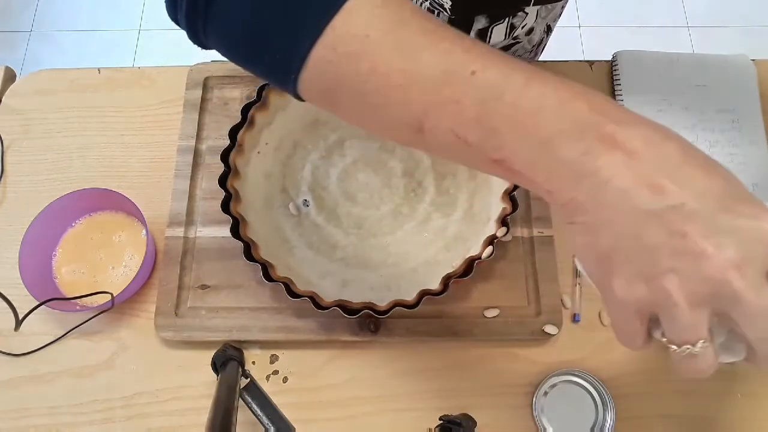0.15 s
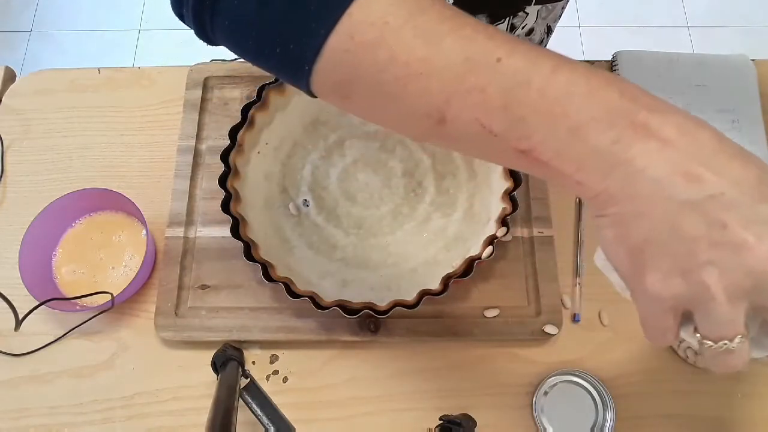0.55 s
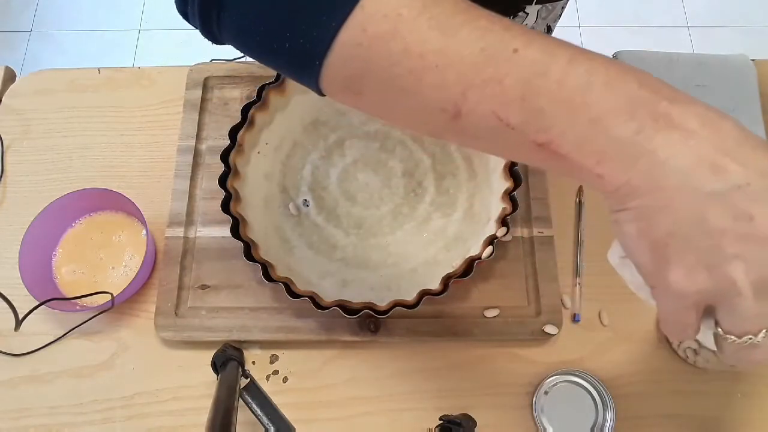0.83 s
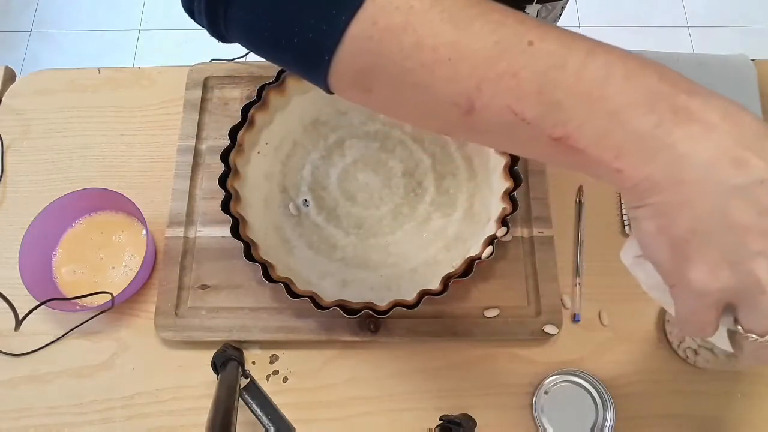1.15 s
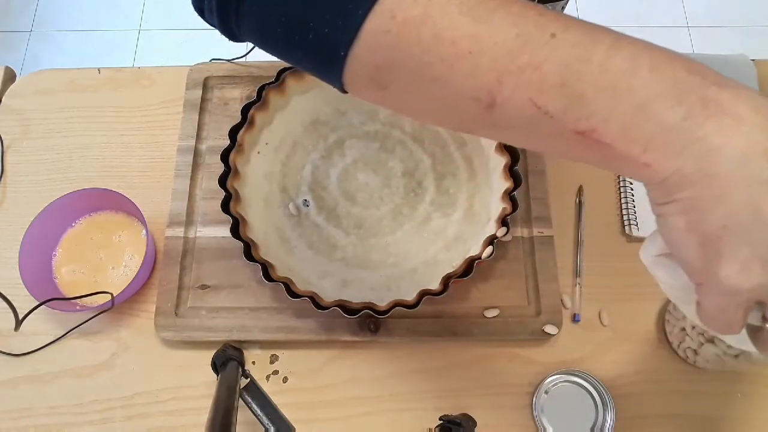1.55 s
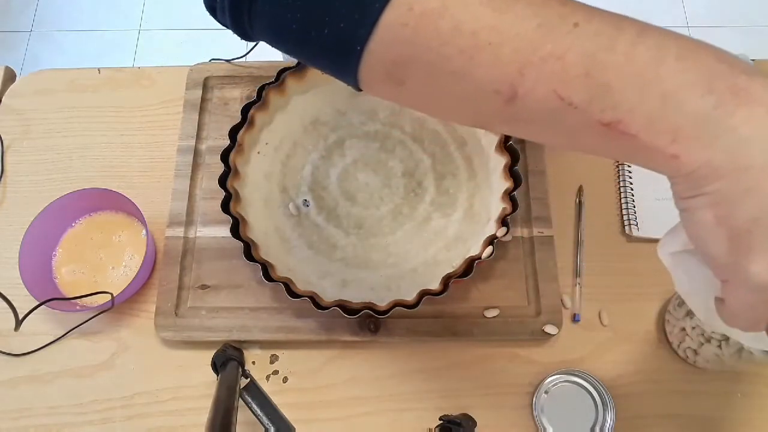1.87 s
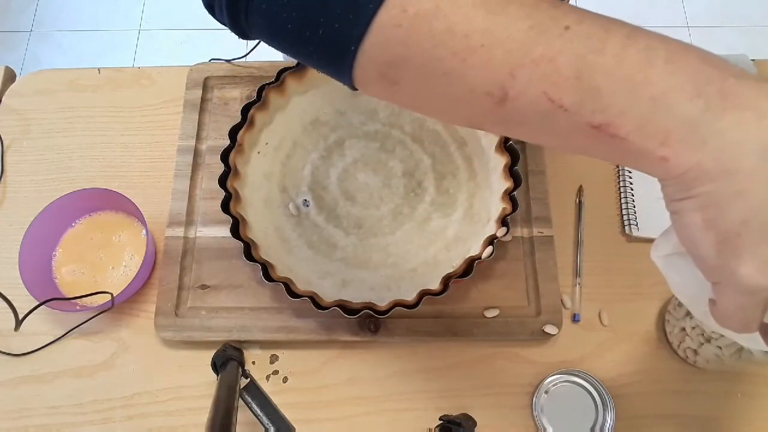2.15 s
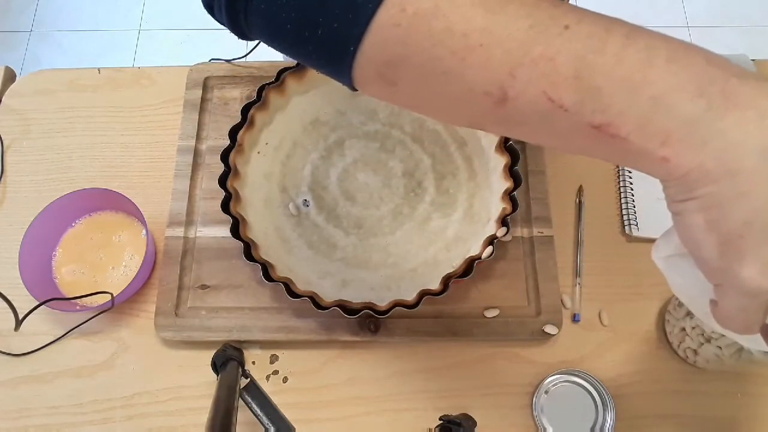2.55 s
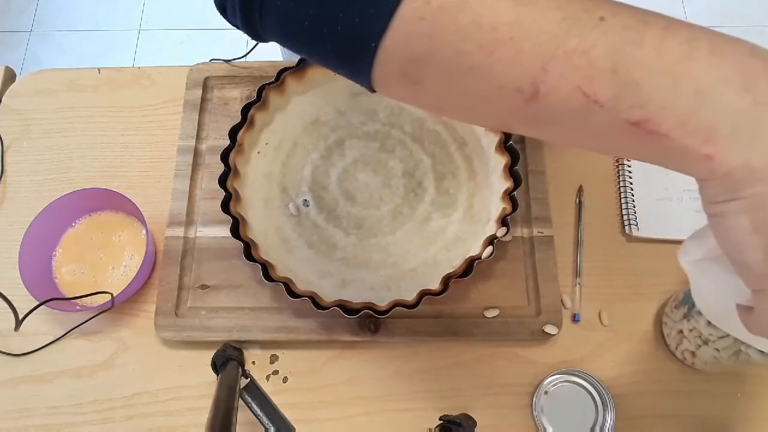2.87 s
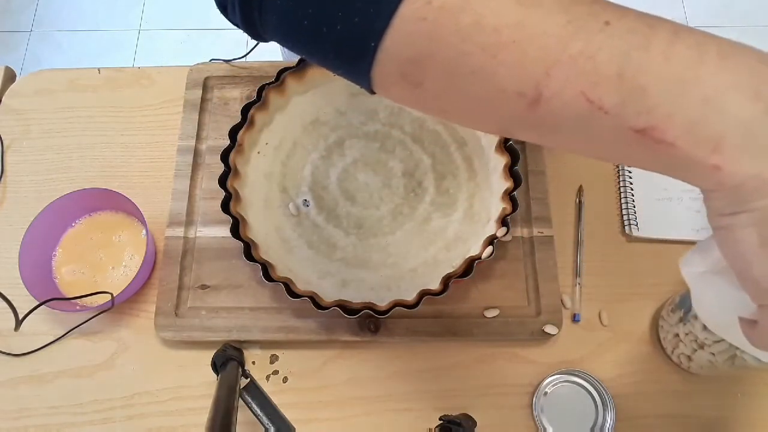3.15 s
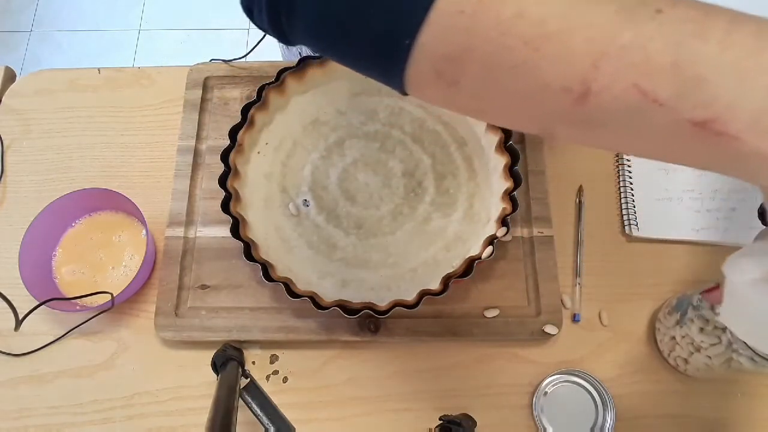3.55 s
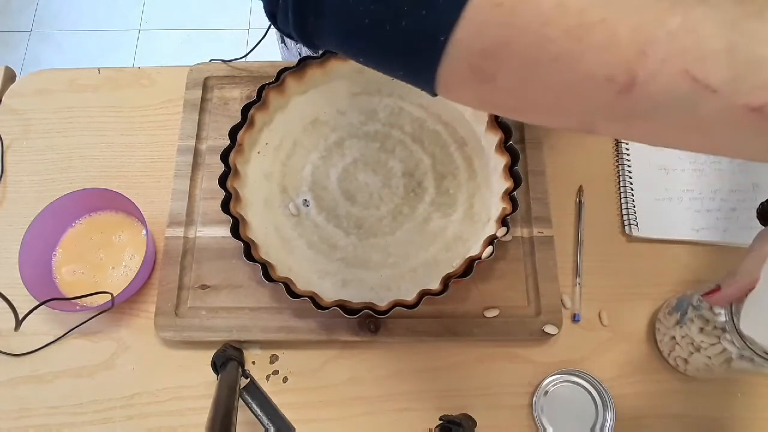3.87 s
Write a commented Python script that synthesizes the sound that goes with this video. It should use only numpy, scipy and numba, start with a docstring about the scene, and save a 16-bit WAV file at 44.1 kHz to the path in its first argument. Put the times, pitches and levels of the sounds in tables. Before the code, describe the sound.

Close up in a lively kitchen, a dense rattle of dried beans fills a glass jar, with bright clinks at first and a growing hollow drumming as the heap rises. Halfway through, the beans stop and a stiff sheet of baking paper gives a few sharp cracks and flaps, mixed with dull knocks. Finally the sheet is gathered up, crinkling and sliding over itself.

```python
"""Dried beans slide off a sheet of baking paper into a glass jar on a wooden table, in a live kitchen.
They come in surges, clacking on each other, drumming on the heap and ringing the glass, which goes dull
as it fills. After two seconds the pour runs out, and the emptied paper snaps and flaps a few times
among soft knocks. Last, the sheet is crumpled away, crackling and sliding over itself."""
import sys
import numpy as np
from scipy import signal
from scipy.fft import rfft, irfft
from scipy.io import wavfile
from scipy.ndimage import uniform_filter1d
from numba import njit

SR = 44100
rng = np.random.default_rng(int(sys.argv[2]) if len(sys.argv) > 2 else 0)


def wrap_up_sound(samples):
    """Save the sound to the file named by the first command line argument, as 16-bit audio."""
    columns = np.atleast_2d(samples).T
    # keep every value between -1 and 1, then stretch to whole-number steps
    tamed = np.clip(columns, -1, 1)
    steps = np.round(tamed * 32767).astype(np.int16)
    wavfile.write(sys.argv[1], SR, steps)


N = 176796
TIME = np.arange(N) / SR

# How far the heap presses on the jar wall. Each row: time in seconds, share from 0 to 1.
JAR_FILL = [(0, 0), (.6, 0.12), (1.0, 0.26), (1.3, 0.48), (1.55, 0.67), (2.0, 0.81)]
# Dull knocks of beans, paper and jar. Each row: start in seconds, peak in dB, pitch in Hz,
# send to the table in dB.
DULL_KNOCKS = [(.672, -18, 1110, 2.5), (.739, -17.5, 900, -9), (.905, -17, 440, -5), (1.409, -15, 527, -1),
               (1.61, -15.5, 1210, -13), (1.670, -11, 454, -20), (1.966, -8.5, 590, -20),
               (2.022, -15, 850, -5), (2.128, -17, 1770, -18), (2.278, -17, 830, -8), (2.429, -32, 860, -3),
               (2.441, -19, 600, -11), (2.920, -13.5, 560, -9), (2.955, -19, 328, 7),
               (3.026, -24.5, 900, 13), (3.138, -25, 690, -4), (3.216, -21.5, 840, 8.5),
               (3.467, -30.5, 770, -12), (3.593, -23.5, 726, -2), (3.647, -23, 1150, -5),
               (3.85, -19, 335, 17)]
# The papery body of a knock or flap. Each row: frequency in Hz, level in dB.
SHEET_TONE = [(30, -21), (80, -11), (130, -11), (210, -7), (330, 2.5), (520, -2.5), (850, 4.5),
              (1250, -1.5), (1900, -6.5), (3500, -19.5), (16000, -51)]
# Stiff creases flipping over. Each row: start in seconds, relative level in dB, treble gain in dB.
CREASE_SNAPS = [(2.025, -23.5, -20), (2.0868, -14.5, 9), (2.127, -22, -11), (2.2262, -31, 9),
                (2.28, -33, 10), (2.357, -18.5, -0.5), (2.532, -22.5, -1), (2.537, -12, 4),
                (2.6923, -27, -5), (2.8013, -30.5, -1), (2.807, -39.5, 9), (2.825, -20, 3.5),
                (3.022, -23, -11), (3.199, -39, 3), (3.443, -50, 17), (3.568, -35.5, -5), (3.593, -29, 9),
                (3.747, -34.5, 10), (3.779, -32, 2), (3.792, -31, 5), (3.876, -31.5, 15), (3.931, -34, 0),
                (3.953, -25.5, 1.5), (3.9724, -43, -15)]
# How hard the hand gathers up the sheet. Each row: time in seconds, effort in dB.
HAND_EFFORT = [(3.25, -10.5), (3.5, -12.5), (3.58, -4.5), (3.72, -2), (3.86, 5.5), (3.91, -5), (3.96, 5.5),
               (4.01, -12)]


def from_db(db):
    """Decibels to gain."""
    return 10 ** (np.asarray(db) / 20)


def steady(x, span_s=0.078):
    """Ride the slow level to about rms 1 and keep the grain."""
    power = np.abs(uniform_filter1d(x ** 2, int(span_s * SR)))
    return x / np.sqrt(power + 1e-3 * np.mean(x ** 2))


def in_time(curve):
    """Read an automation curve at every sample."""
    return np.interp(TIME, *np.transpose(curve))


def at_hz(curve, hz):
    """Read a curve on a log-frequency axis."""
    freqs, values = np.transpose(curve)
    return np.interp(np.log(np.maximum(hz, 1)), np.log(freqs), values)


def colour(x, spectrum, size=8192):
    """Minimum-phase EQ of unit energy with the given spectrum."""
    gains = from_db(at_hz(spectrum, np.fft.rfftfreq(size, 1 / SR)))
    cepstrum = irfft(np.log(gains))
    response = irfft(np.exp(rfft(2 * cepstrum[:size // 2], size)))
    return signal.fftconvolve(x, response / np.linalg.norm(response))[:len(x)]


def resonate(x, hz, width_hz):
    """A resonance with gain 1 at its peak."""
    r = np.exp(-np.pi * width_hz / SR)
    feedback = [1, -2 * r * np.cos(2 * np.pi * hz / SR), r * r]
    return signal.lfilter(np.array([1, 0, -1]) * (1 - r * r) / 2, feedback, x + 1e-18)


@njit
def ring(force, hz, width_hz):
    """A mode whose pitch and damping move; keeps the power of a white force."""
    out, state = np.zeros(len(force)), 0j
    for i in range(len(force)):
        r = np.exp(-np.pi * width_hz[i] / SR)
        state = state * r * np.exp(2j * np.pi * hz[i] / SR) + force[i] * np.sqrt(2 * (1 - r * r))
        out[i] = state.imag
    return out


def impacts(per_s, spread_db):
    """Random contacts, many light and a few heavy."""
    sizes = from_db(spread_db * np.minimum(rng.exponential(1, N), 4)) * rng.choice([-1, 1], N)
    return sizes * (rng.random(N) < per_s / SR)


def add(track, s, sound):
    """Mix a short sound in at s seconds."""
    part = track[int(s * SR):][:len(sound)]
    part += sound[:len(part)]


def burst(decay_s, size=2048):
    """A fast-dying puff of noise."""
    return rng.standard_normal(size) * np.exp(-TIME[:size] / decay_s)


def swell(start_s, end_s, attack_s, release_s):
    """An envelope that rises from start_s and dies away from end_s."""
    attack = 1 - np.exp(-np.maximum(TIME - start_s, 0) / attack_s)
    return attack * np.exp(-np.maximum(TIME - end_s, 0) / release_s)


def glass(hits, flow, fill, shielded_s=1.61, shield_db_per_s=23, clink_octaves=0.16):
    """Beans ring the jar; the growing heap damps and stiffens the wall, then shields it from hits."""
    # Glass modes. Each row: pitch in Hz, width in Hz, level in dB, then what a full jar adds to
    # the width in Hz, to the level in dB and to the pitch in Hz.
    modes = [(1900, 130, -19, 75, 1, 35), (2563, 10.3, -11, 72, -1.5, 40),
             (4315, 34, -4.5, 420, -10.5, 262), (5590, 100, -7.5, 307, -25, 99),
             (5770, 29, -2, 405, -14.5, 278), (8080, 69, -21.5, 40.5, 19, 9), (8050, 120, -6, 71, -26, 12),
             (9240, 8.5, -8.5, 128, -7, 118), (9435, 99, -14.5, 110, -4, 68), (9890, 77, -13, 200, -6, 44),
             (10500, 240, -23, 200, -15, 0), (11340, 69, -14.5, 300, -9, 32),
             (11970, 160, -19.5, 200, 1, 0), (13300, 200, -23, 150, 0, 0), (14000, 250, -24, 200, -10, 0),
             (14600, 900, -21.5, 0, -12, 0)]
    # Single hard hits. Each row: start in seconds, relative level in dB, frequency that rings most in Hz.
    clinks = [(0.251, -16, 4350), (.287, -30, 4380), (.617, -8.5, 2570), (.661, -15.5, 7900),
              (0.801, -19.5, 5700), (.828, -16.5, 9450), (.921, -22, 4300), (1.456, -17, 7800),
              (1.528, -21, 8000), (1.556, -19, 7900), (1.580, -16.5, 7700), (1.699, -16.5, 8140)]
    force = flow * from_db(-24.5 - shield_db_per_s * np.maximum(TIME - shielded_s, 0))
    out = 0
    for hz, width_hz, db, damping_hz, full_db, rise_hz in modes:
        pitch, width = hz + rise_hz * fill, width_hz + damping_hz * fill
        stream = steady(ring(hits * rng.standard_normal(N), pitch, width), span_s=0.24)
        hard_hits = np.zeros(N)
        for s, hit_db, best_hz in clinks:   # where a bean lands decides which modes it wakes
            detuning = np.log2(hz / best_hz) / clink_octaves
            add(hard_hits, s, 20 * from_db([hit_db]) / (1 + detuning ** 2))
        out += from_db(db + full_db * fill) * (stream * force + ring(hard_hits, pitch, width))
    return out


def beans(clack_db=-40.5, clack_growth_db=11.5, trickle_db_per_s=60):
    """Beans fall in surges, striking the glass and clacking on each other more as the heap grows."""
    # Surges off the paper. Each row: start in seconds, end in seconds, strength in dB.
    surges = [(-0.08, 0.458, 0.36), (0.508, 0.946, 0.84), (0.983, 1.367, 2.5), (1.402, 2.083, -1.5)]
    # Bean against bean. Each row: frequency in Hz, level in dB.
    clack_tone = [(300, -43.5), (900, 7.5), (1500, 2.5), (2200, 0), (3000, -4.5), (3900, 1.5), (5200, 0.5),
                  (7000, 1.5), (9500, -4), (12500, -18), (16000, -7)]
    flow = sum(from_db(db) * swell(start, end, 0.047, 0.045) for start, end, db in surges)
    fill = in_time(JAR_FILL)
    hits = steady(impacts(per_s=1100, spread_db=2.0))
    clack_gain = flow ** 0.13 * from_db(clack_db + clack_growth_db * np.sqrt(fill))
    clacks = clack_gain * steady(colour(hits, clack_tone))
    running_out = from_db(-trickle_db_per_s * np.maximum(TIME - surges[-1][1], 0))
    return (glass(hits, flow, fill) + clacks) * running_out


def table(thuds, width_hz=45):
    """The well-damped wooden resonances that a thud wakes."""
    # Tabletop modes. Each row: pitch in Hz, level in dB.
    modes = [(140, 3), (200, -7), (340, -2.5), (590, -1.5)]
    return sum(from_db(db) * resonate(thuds, hz, width_hz) for hz, db in modes)


def drumming(air_db=1.9, air_width_hz=90.0, heap_growth_db=14.5):
    """Beans thud on the heap, shake the table and stir the air in the jar."""
    # A thud on the heap. Each row: frequency in Hz, level in dB.
    thud_tone = [(30, -46), (90, -29), (160, -20), (280, -8.5), (380, -6.5), (480, -1.5), (700, -6),
                 (1200, -7), (1600, -18.5), (3000, -20.5), (16000, -67)]
    # The jar's air note, rising as beans take up room. Each row: time in seconds, pitch in Hz.
    air_note = [(0, 403), (.35, 443), (.8, 460), (2.0, 470)]
    thuds = colour(impacts(per_s=450, spread_db=1.5), thud_tone)
    airflow = ring(thuds, in_time(air_note), np.full(N, air_width_hz))
    air = steady(np.gradient(airflow))   # only the change of flow is heard, so no deep bass
    heap = from_db(heap_growth_db * in_time(JAR_FILL)) * steady(thuds + table(thuds))
    return steady(heap + from_db(air_db) * air)


def knocks(width_hz=300, rattle_s=0.01, rattle_db=-22):
    """Soft contacts: a push that rings for a few cycles, a brief paper rattle, and the table below."""
    out = np.zeros(N)
    for s, db, hz, send_db in DULL_KNOCKS:
        force = from_db(rattle_db) * burst(rattle_s, size=4096)
        force[0] += 1   # the push
        thud = colour(force, SHEET_TONE)
        knock = resonate(thud, hz, width_hz) + from_db(send_db + 0.5) * table(thud)
        add(out, s, from_db(db) * knock / np.abs(knock).max())
    return out


def trembling(knock_db=-5, attack_s=0.0043, settle_s=0.041):
    """Envelope of the loose sheet's shiver after each knock and snap."""
    jolts = [(s, db) for s, db, _ in CREASE_SNAPS] + [(s, db + knock_db) for s, db, _, _ in DULL_KNOCKS]
    return np.sqrt(sum((from_db(db) * swell(s, s, attack_s, settle_s)) ** 2 for s, db in jolts))


def flapping():
    """The loose sheet flutters against the table."""
    flaps = colour(impacts(per_s=600, spread_db=2.0), SHEET_TONE)
    return steady(flaps + from_db(-11.5) * table(flaps))


def heap_and_sheet(tremble, empty_s=2.15, crossfade_s=0.28, release_db_per_s=135):
    """The drumming passes to the emptying sheet, which flutters on when held, jolted or gathered."""
    # Fader ride of the hollow drumming. Each row: time in seconds, relative level in dB.
    fader = [(0, -29.5), (0.59, -31.5), (0.62, -27), (1.05, -26.5), (1.68, -23.5), (1.8, -25), (2.05, -26),
             (2.32, -36)]
    pour = from_db(in_time(fader) - release_db_per_s * np.maximum(TIME - fader[-1][0], 0))
    held, jolted, gathered = from_db(-47), from_db(-19.5) * tremble, from_db(in_time(HAND_EFFORT) - 36)
    flutter = np.sqrt(pour ** 2 + held ** 2 + jolted ** 2 + gathered ** 2)
    empty = 0.5 + 0.5 * np.tanh((TIME - empty_s) / crossfade_s)
    heap = from_db(-1) * pour * drumming()
    return np.sqrt(1 - empty) * heap + np.sqrt(empty) * flutter * flapping()


def snaps(level_db=24, decay_s=0.0019, attack_s=0.00031, treble_hz=6000):
    """Creases buckle in milliseconds: returns ragged direct cracks and smooth ones for the room send."""
    # The crack of stiff paper. Each row: frequency in Hz, level in dB.
    crack_tone = [(30, -46), (150, -47), (400, -4), (950, 4.5), (1500, 1), (2200, 1), (2900, 1),
                  (4000, 2.5), (6000, 2.5), (8000, 0), (10000, -7.5), (13000, -13), (16000, -20)]
    highpass = signal.butter(1, treble_hz, "high", fs=SR, output="sos")
    direct, send = np.zeros(N), np.zeros(N)
    for s, db, treble_db in CREASE_SNAPS:
        ragged = burst(decay_s)
        ragged *= 1 - np.exp(-TIME[:len(ragged)] / attack_s)
        # ripples average out over all directions
        smooth = signal.unit_impulse(len(ragged), round(decay_s * SR))
        for track, force in (direct, ragged), (send, smooth):
            crack = colour(force, crack_tone)
            crack += (from_db(treble_db) - 1) * signal.sosfilt(highpass, crack)
            add(track, s, from_db(db + level_db) * crack / np.linalg.norm(crack))
    return direct, send


def crumple(tremble, crease_from_s=3.3, slip_at_s=3.51, grain_s=0.00039):
    """Tiny creases give way as the sheet is jolted or gathered; it slips, then slides over itself."""
    # Tiny creases popping. Each row: frequency in Hz, level in dB.
    crackle_tone = [(500, -13), (1500, -0.5), (2800, -6.5), (4200, -1), (6000, -5), (8200, 0), (11000, -14),
                    (16000, -23)]
    # Paper rubbing on paper. Each row: frequency in Hz, level in dB.
    rub_tone = [(1500, -27), (4000, 1), (9000, 5), (13000, -3), (16000, -11)]
    pops = np.abs(impacts(per_s=380, spread_db=7.5))
    pop_envelope = signal.lfilter([1], [1, -np.exp(-1 / (grain_s * SR))], pops + 1e-18)
    grains = steady(colour(pop_envelope * rng.standard_normal(N), crackle_tone), span_s=0.13)
    rubbing = colour(rng.standard_normal(N), rub_tone)
    effort_db = in_time(HAND_EFFORT)
    creasing = from_db(-42 + 0.79 * effort_db) * (TIME > crease_from_s)
    sliding = from_db(-50 + effort_db) * (TIME > slip_at_s)
    slip = from_db(-39) * swell(slip_at_s, slip_at_s, attack_s=0.002, release_s=0.05)
    crackle = np.hypot(creasing, from_db(-27) * tremble) * grains
    swish = np.hypot(sliding + slip, from_db(-33) * tremble) * rubbing
    return crackle + swish


def kitchen(x, early_s=0.027, early_db=2.0, dull_hz=9000):
    """Dense, slightly dull reflections, lifted at the start and dying band by band; unit energy."""
    # The kitchen's decay. Each row: frequency in Hz, time to fall 60 dB in seconds.
    decay_times = [(100, 0.76), (700, 0.62), (2000, 0.87), (5000, 0.71), (9000, 0.55), (16000, 0.77)]
    t, hz = TIME[:SR], np.fft.rfftfreq(SR, 1 / SR)
    spectrum = rfft(rng.standard_normal(SR)) / np.sqrt(1 + (hz / dull_hz) ** 2)
    edges = np.geomspace(30, SR / 2, 48)
    tail = 0
    for low, high in zip(edges, edges[1:]):
        band = irfft(spectrum * (hz >= low) * (hz < high), SR)
        tail += band * from_db(-60 * t / at_hz(decay_times, np.sqrt(low * high)))
    tail[t < early_s] *= from_db(early_db)
    return signal.fftconvolve(x, tail / np.linalg.norm(tail))[:N]


def hush(level_db=-52.5):
    """A faint, even bed of noise under everything."""
    # The colour of the bed. Each row: frequency in Hz, level in dB.
    hush_tone = [(20, -8), (100, -1), (400, 11), (1500, -1), (6000, 4), (16000, -13)]
    noise = colour(rng.standard_normal(N), hush_tone)
    return from_db(level_db) * noise / np.sqrt(np.mean(noise ** 2))


def scene():
    """Jar and paper close up in mono, each with its own pattern of kitchen reflections."""
    tremble = trembling()
    pour = beans()
    body = heap_and_sheet(tremble) + knocks()
    rustle = crumple(tremble)
    cracks, crack_send = snaps()
    jar_room = kitchen(from_db(-4) * pour + from_db(-8.5) * body)
    paper_room = kitchen(from_db(-3) * rustle + from_db(0.5) * crack_send)
    return (pour + body + rustle + cracks + jar_room + paper_room + hush())[None]


def record(dry, cutoff_hz=15900):
    """Soft saturation rounds the highest peaks, and a steep low-pass trims the top."""
    rounded = np.tanh(dry / 1.291) * 1.297
    return signal.sosfilt(signal.ellip(12, 0.1, 80, cutoff_hz, fs=SR, output="sos"), rounded)


dry = scene()
out = record(dry)
wrap_up_sound(out)
```